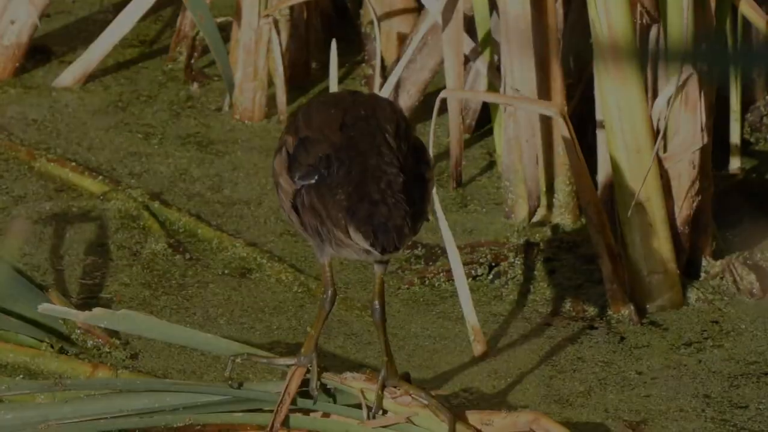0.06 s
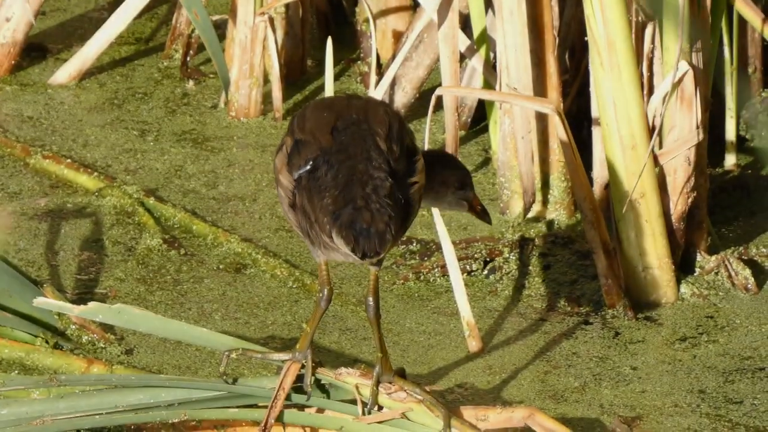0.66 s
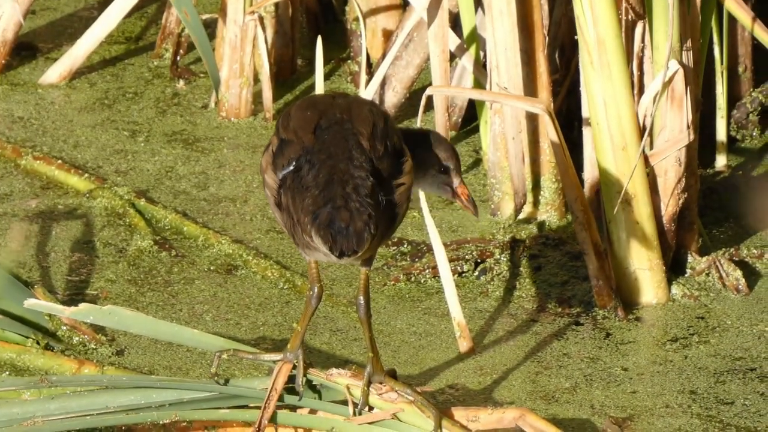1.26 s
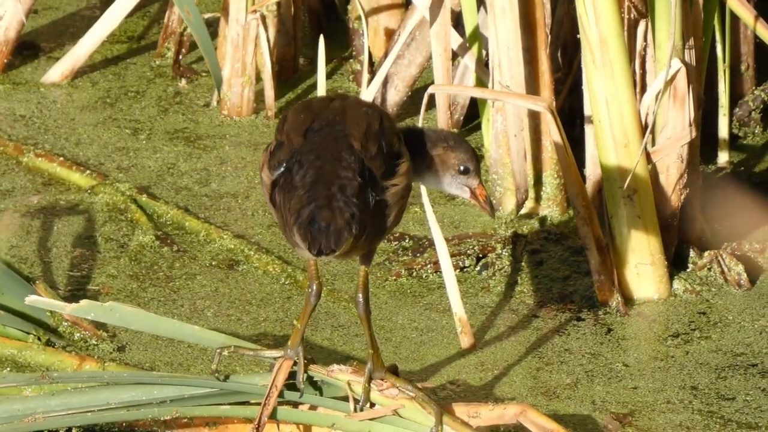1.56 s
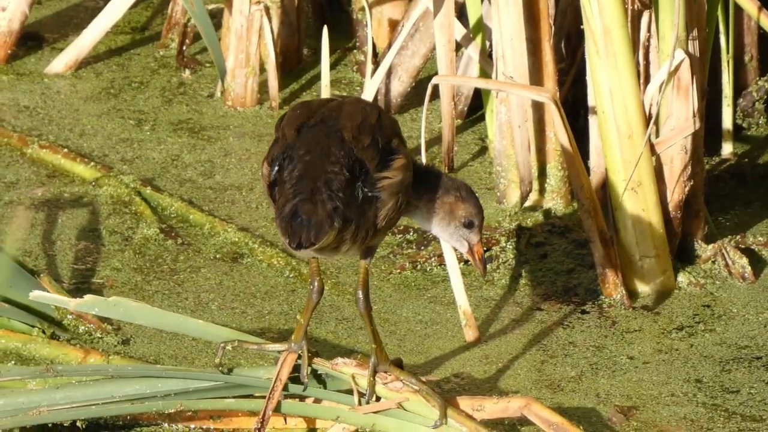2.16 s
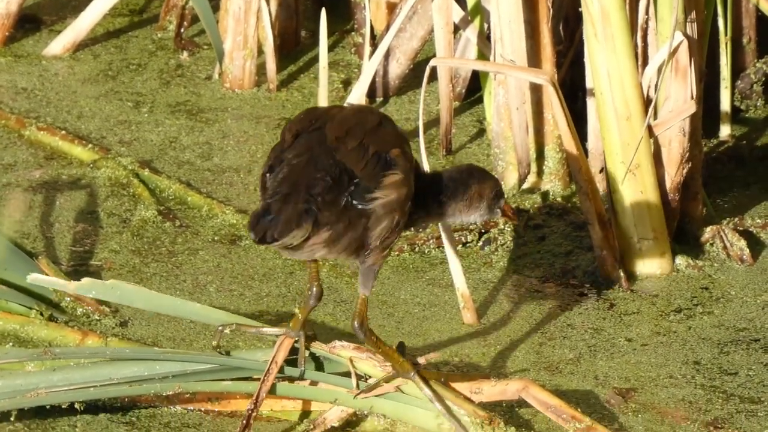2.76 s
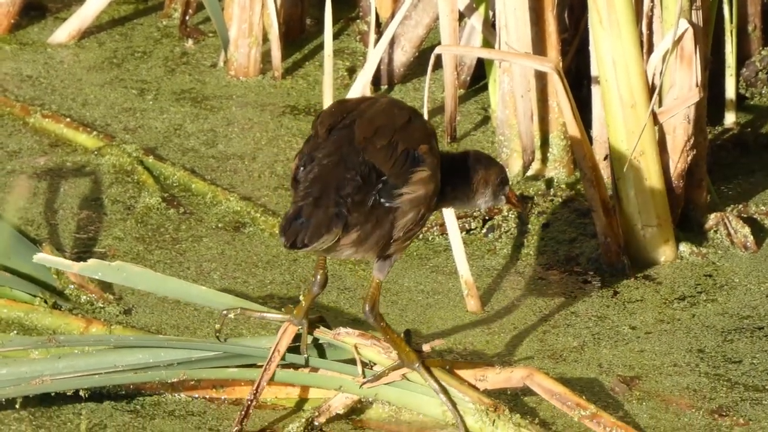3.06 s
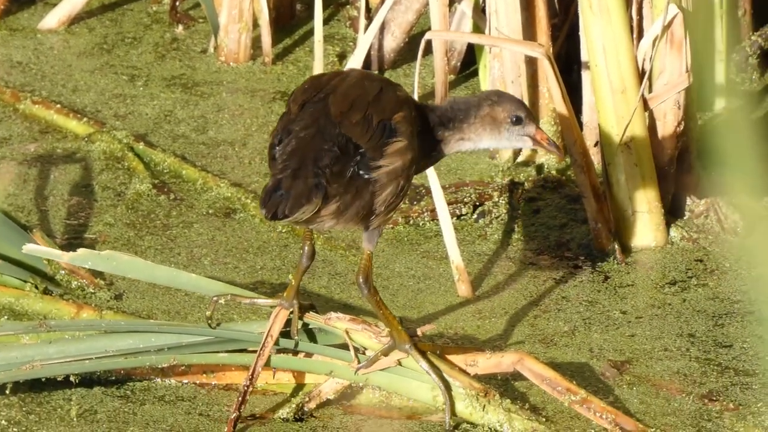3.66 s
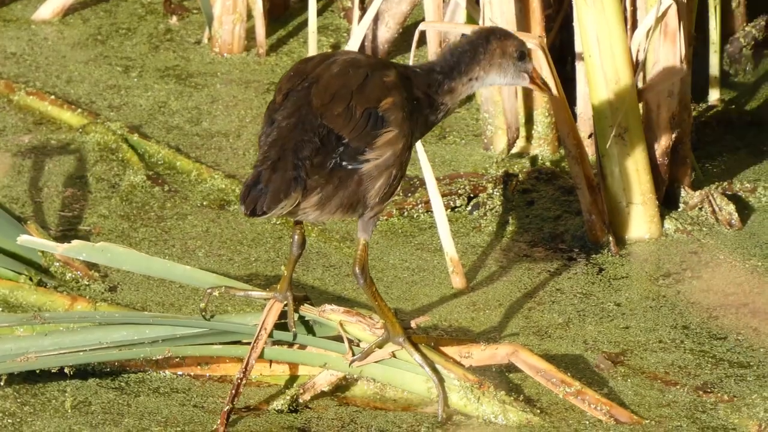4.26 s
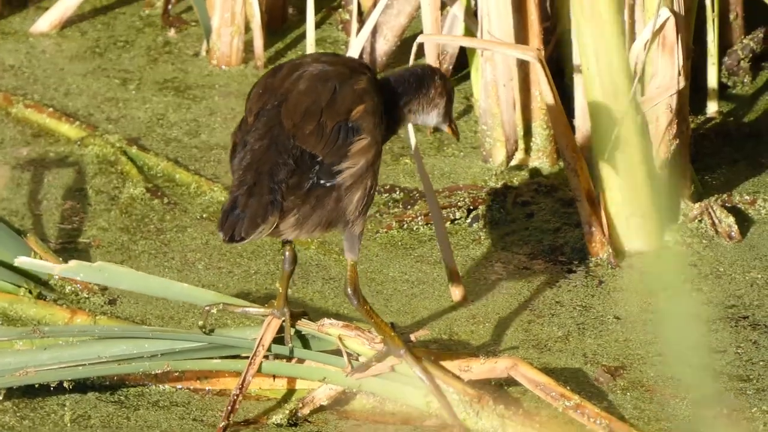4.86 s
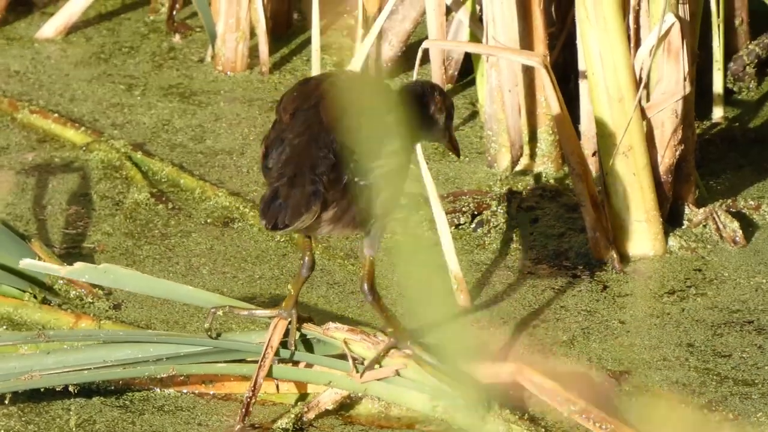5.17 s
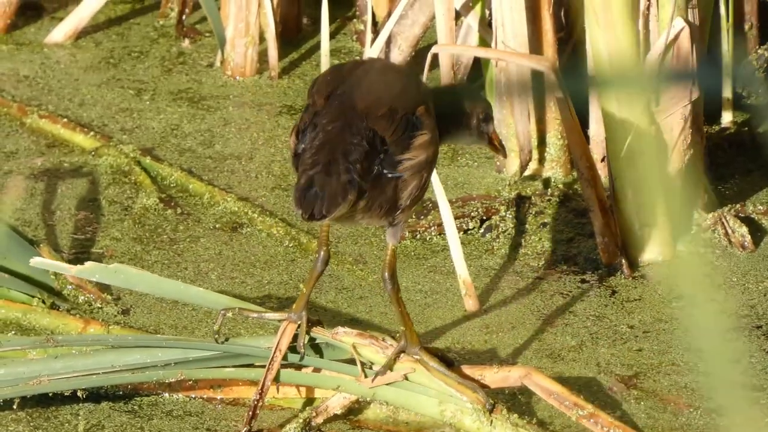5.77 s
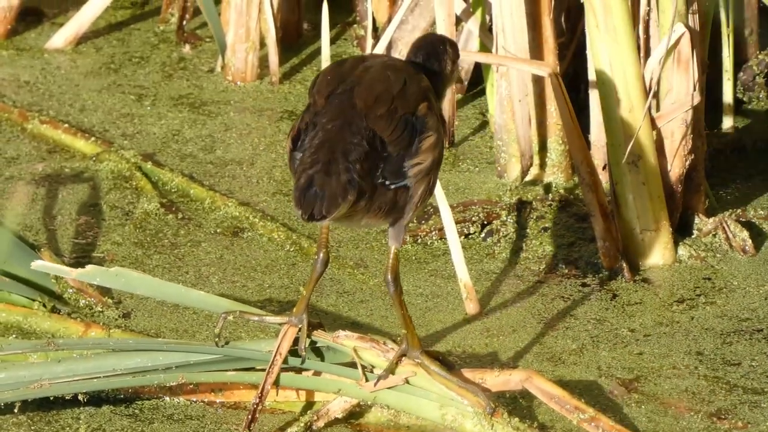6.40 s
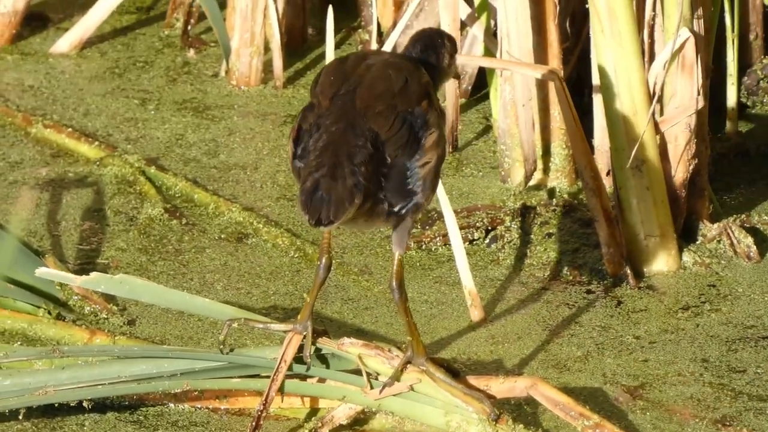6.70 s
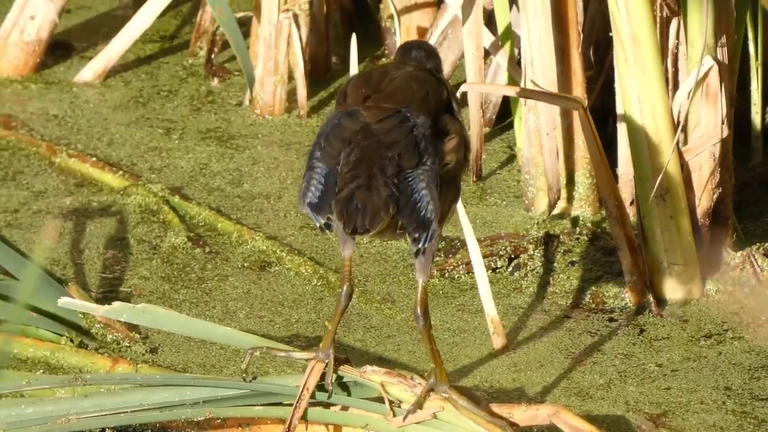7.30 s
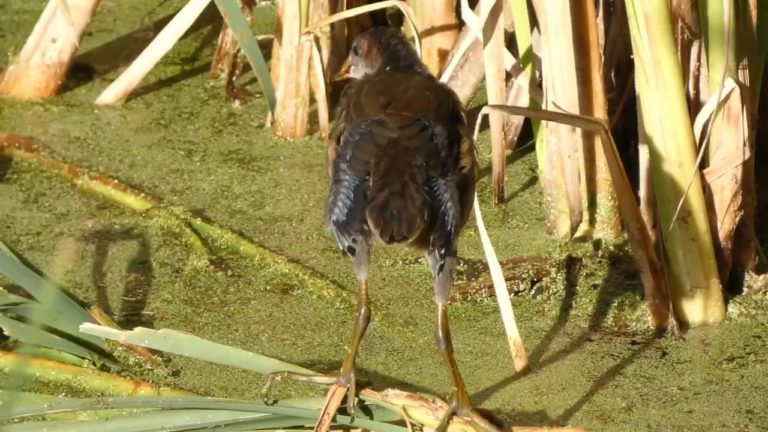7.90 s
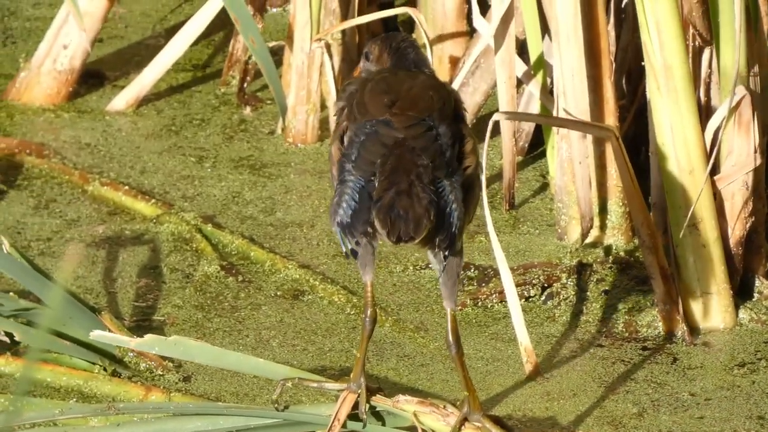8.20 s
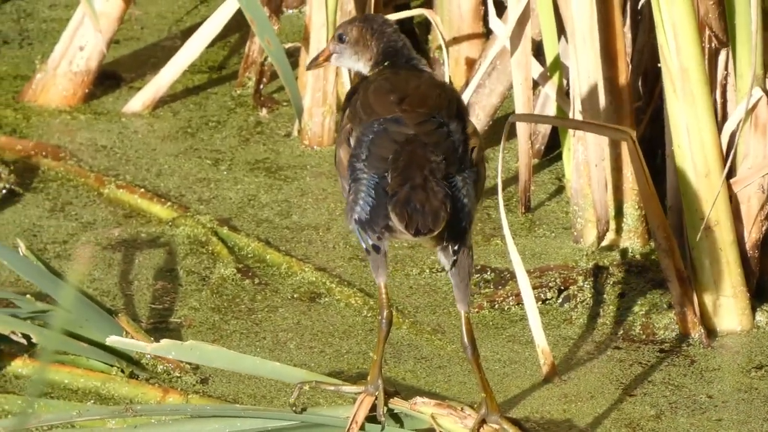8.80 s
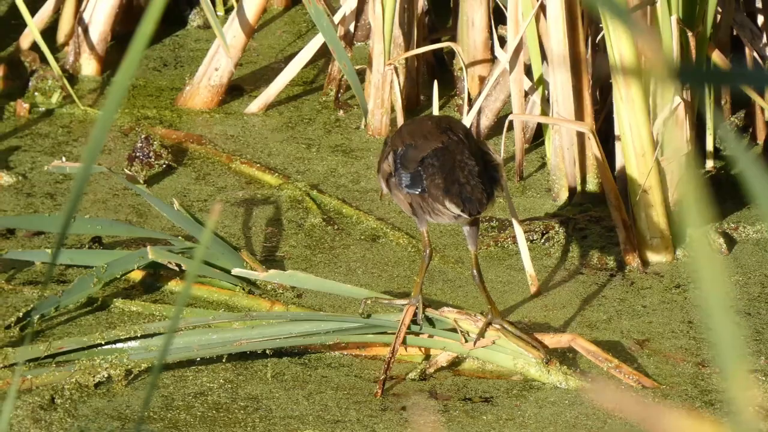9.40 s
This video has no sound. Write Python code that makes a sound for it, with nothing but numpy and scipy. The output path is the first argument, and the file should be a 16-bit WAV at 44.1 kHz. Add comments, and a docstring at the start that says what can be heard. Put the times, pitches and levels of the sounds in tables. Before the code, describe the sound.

Low, uneven wind buffets the microphone in a reed bed by a pond, strongest in the first few seconds. A short, close creak sounds, then the gusts ease, leaving a soft reed hiss, faint bird chirps and a far-off roar leaning to the right. The wind picks up again late on, another little creak follows, and something stiff snaps once.

```python
"""A breezy reed bed by a pond. From the start, reeds hiss over a far-off roar that leans to the right.
Within a second gusts thump on the microphone, and the recorder turns itself down under the strongest.
Leaves rush, dry stems tick and small birds chirp faintly. Just after 3 s something stiff creaks close
by, and then the wind dies down. Near 8 s the gusts pick up again, a second creak follows, and near 9 s
comes one sharp snap."""
import sys
import numpy as np
from scipy import signal
from scipy.io import wavfile
from scipy.ndimage import uniform_filter1d, minimum_filter1d

SR = 44100
rng = np.random.default_rng(int(sys.argv[2]) if len(sys.argv) > 2 else 0)


def transcribe(signal):
    """Save signal, clipped to [-1, 1], as a 16-bit WAV file at the path in sys.argv[1]."""
    frames = np.atleast_2d(signal).T
    limited = np.clip(frames, -1, 1)
    pcm = np.round(limited * 32767).astype(np.int16)
    wavfile.write(sys.argv[1], SR, pcm)


N = 416744

# how alike the background is on the left and right: pitch_hz, likeness (1 = the same)
AIR_LIKENESS = [(60, 0.88), (200, .4), (420, 0.56), (750, .1), (1300, 0.71), (3000, 0.65), (7000, 0.63),
                (14000, .36)]
# which side the roar and hiss lean to: pitch_hz, pan_db (always left minus right)
AIR_BALANCE = [(400, 0), (690, -0.5), (1270, -11.5), (2330, -2), (4300, -0.5), (14000, -2)]
# the tones a dry stem rings with: pitch_hz, level_db, ring_s (time to fade by 60 dB), pan_db
STEM_TONES = [(2780, -18, 0.0061, 0.5), (3400, -4.5, 0.0084, -0.5), (5460, -13, 0.0027, -5),
              (6640, 2.5, 0.0055, -4.5), (9130, -5, 0.0076, -10)]


def gust_strength(attack_s=0.022, fall_db_per_s=265, calm_db=-61.5):
    """The wind's level in dB: each gust comes on quickly, holds, then drops away to calm air."""
    # gusts reaching the microphone: start_s, length_s, level_db
    gusts = [(0.617, 0.18, -34.5), (0.81, 0.1, -34.5), (0.915, 0.057, -30), (1.041, 0.053, -26.5),
             (1.127, 0.19, -26.5), (1.335, 0.17, -32), (1.544, 0.028, -34.5), (1.609, 0.081, -28.5),
             (1.73, 0.14, -24), (1.965, 0.64, -27), (2.145, 0.35, -23), (2.497, 0.29, -23),
             (2.765, 0.15, -22), (2.949, 0.32, -24.5), (3.3, 0.222, -26), (3.523, 0.15, -25),
             (3.67, 0.056, -29), (3.875, 0.096, -38.5), (4.092, 0.07, -38.5), (4.398, 0.062, -46),
             (4.492, 0.12, -34), (4.63, 0.044, -37.5), (4.688, 0.096, -32), (5.011, 0.11, -32.5),
             (5.178, 0.18, -41), (5.438, 0.15, -47), (5.652, 0.038, -41), (5.717, 0.04, -35.5),
             (5.824, 0.063, -36.5), (5.948, 0.055, -42), (6.278, 0.064, -44.5), (7.167, 0.11, -36.5),
             (7.843, 0.12, -31), (8.006, 0.088, -29.5), (8.172, 0.15, -30), (8.62, 0.035, -33.5),
             (8.677, 0.12, -29.5), (8.826, 0.12, -34.5), (9.003, 0.097, -40)]
    age_s = np.arange(SR) / SR
    power = np.full(N, from_db(calm_db) ** 2)
    for start_s, length_s, db in gusts:
        onset = np.minimum(age_s / attack_s, 1)
        lost_db = fall_db_per_s * np.maximum(age_s - length_s, 0)
        add(power, start_s, (onset * from_db(db - lost_db)) ** 2)
    return 10 * np.log10(power)


def wind(gust_db, boost_db=1.0, strong_db=-28.0, brightening=0.12, thinning=0.68):
    """Swirling air beats on the microphone; a stronger gust sheds smaller swirls, which sound higher."""
    # the tone of the rumble: pitch_hz, level_db
    spectrum = [(25, -36), (45, -50.5), (70, -10), (110, 1), (180, 4.5), (320, -5), (490, -29.5),
                (750, -41), (1100, -44.5)]
    # how alike its two sides are: pitch_hz, likeness (noise_bands limits the range)
    likeness = [(60, 0.95), (140, 0.86), (280, 0.49), (550, -1.3), (1100, -0.53)]
    # which side it leans to: pitch_hz, pan_db
    balance = [(100, 4), (200, 1.5), (370, -2.5), (1000, -3)]
    excess_db = np.maximum(gust_db - strong_db, -13)
    tilt_db = thinning * excess_db  # per octave: the weight moves out of the bass
    # small swirls come in quick bursts that lift the upper bands
    reach_db = brightening * excess_db + 2.5 * np.clip(drift(42), -2, 2)
    rumble = 0
    for hz, band in noise_bands(spectrum, likeness, balance):
        octaves_up = np.log2(hz / 180)
        lift_db = reach_db * max(octaves_up, 0) + tilt_db * np.clip(octaves_up, -1.3, 1.5)
        rumble = rumble + band * from_db(lift_db)
    rumble = lowpass(rumble, hz=900, order=3) * flutter(rate=35, depth_db=2.5)
    each_side = np.array([flutter(rate=48, depth_db=3), flutter(rate=25, depth_db=3)])
    rumble = rumble * each_side * panned(-2.45)
    # keep the quick lumps, but let the gust and its puffs set the slow level
    slow_level = np.sqrt(uniform_filter1d(rumble.mean(axis=0) ** 2, size=2400) + 1e-12)
    puffs = flutter(rate=14, depth_db=1.45)
    return rumble / slow_level * from_db(gust_db + boost_db) * puffs


def wind_thumps(rise_share=0.3):
    """A big swirl of air hits the microphone as one thump; smaller, higher ones differ more by side."""
    # single swirls: peak_s, length_s (a third of the whole thump), level_db, pitch_hz, pan_db
    swirls = [(0.626, 0.012, -35.5, 224, -7), (0.66, 0.015, -52, 190, -2), (0.702, 0.018, -33, 162, -9),
              (0.8, 0.013, -26, 189, -4), (0.848, 0.013, -21.5, 178, 2), (0.882, .016, -30, 148, -3),
              (0.908, 0.01, -31.5, 187, -7), (0.963, .011, -23, 199, 7), (1.077, 0.018, -25, 220, 5),
              (1.105, 0.012, -18.5, 298, -13.5), (1.141, 0.018, -28, 310, -4),
              (1.176, 0.011, -21.5, 212, -6), (1.215, .012, -23, 317, -3), (1.251, 0.016, -29, 230, 9),
              (1.307, 0.026, -18, 172, -0.5), (1.491, 0.015, -24.5, 141, 2.5), (1.559, 0.011, -22, 190, 3),
              (1.766, 0.012, -25, 252, -2), (1.801, 0.022, -20, 159, -7), (1.85, 0.015, -20.5, 250, -3),
              (1.948, 0.017, -23.5, 165, -9), (2.029, 0.016, -23, 202, 11), (2.08, 0.021, -18, 250, -4),
              (2.128, .012, -19.5, 201, -7), (2.169, 0.0076, -20, 323, -14), (2.198, 0.02, -19, 336, 3),
              (2.229, 0.0097, -10, 262, -3), (2.24, 0.0075, -18, 427, -12), (2.294, 0.013, -19, 209, 5),
              (2.312, 0.0087, -20.5, 337, 2), (2.338, .018, -13.5, 269, -3), (2.365, 0.012, -21, 334, -2),
              (2.415, .007, -20.5, 392, -12), (2.451, 0.0097, -16.5, 243, 4), (2.469, .012, -18.5, 367, -7),
              (2.532, 0.016, -24, 216, -18), (2.649, 0.021, -22.5, 267, -16), (2.69, 0.024, -19.5, 279, -3),
              (2.717, 0.0075, -29, 420, -1), (2.809, 0.008, -13, 223, -4.5), (2.836, 0.013, -19, 370, -7),
              (2.904, 0.022, -15.5, 222, 0), (3.003, 0.022, -22, 155, 0), (3.032, 0.011, -22, 322, -3),
              (3.063, 0.018, -21.5, 300, -18), (3.113, .008, -29, 345, -10),
              (3.166, 0.0086, -21.5, 363, -3), (3.22, 0.0087, -29, 360, -8), (3.246, 0.013, -12.5, 182, -1),
              (3.316, 0.0057, -24, 330, -9), (3.335, 0.027, -21.5, 248, -6), (3.418, 0.024, -25, 218, -7),
              (3.594, 0.03, -19.5, 197, 5), (3.654, 0.013, -23.5, 325, 13), (3.957, .012, -34, 159, 0),
              (4.153, .014, -39, 162, 0), (4.576, 0.016, -28, 187, -4), (4.653, 0.01, -21.5, 194, -8),
              (4.714, 0.012, -34, 157, -8), (4.822, 0.01, -32.5, 164, -3), (5.037, .01, -24, 185, -11),
              (5.078, 0.011, -26.5, 171, -2), (5.4, 0.011, -35, 148, -5), (5.761, 0.021, -32, 146, 4),
              (7.212, 0.021, -30.5, 171, 7), (7.262, 0.018, -33, 163, 3), (7.9, 0.009, -31, 370, 5),
              (7.921, .012, -20, 193, 6), (7.943, .014, -24, 204, 6), (8.078, .014, -29, 209, 2),
              (8.102, 0.0088, -35.5, 175, -7), (8.217, 0.012, -29, 185, -6), (8.223, .012, -29.5, 340, 3),
              (8.251, .009, -23, 216, -3), (8.267, 0.013, -33, 390, 0), (8.271, 0.012, -25.5, 216, 2),
              (8.302, 0.01, -26.5, 173, -6), (8.726, .012, -24, 172, 6), (8.767, 0.017, -32, 210, 2.5),
              (8.881, .013, -30, 150, -2)]
    out = np.zeros((2, N))
    for peak_s, length_s, db, hz, pan_db in swirls:
        progress = np.linspace(0, 1, round(3 * length_s * SR))
        swell = np.sin(np.pi / 2 * np.interp(progress, [0, rise_share, 1], [0, 1, 0])) ** 2
        noise = highpass(rng.standard_normal((2, SR // 4)), 0.76 * hz, order=3)
        noise = lowpass(noise, 1.071 * hz, order=4)[:, -len(swell):]
        middle, side = (rms_one(part * swell) * swell.std() * np.sqrt(3) for part in noise)
        side = side * from_db(-10 + 8 * np.log2(hz / 180))
        thump = from_db(db) * (middle + side * [[1], [-1]]) * panned(pan_db)
        add(out, peak_s - rise_share * len(swell) / SR, thump)
    return out


def creaks(unevenness=0.072, scrape_db=-37, scrape_s=0.18, grains_per_s=6000):
    """A stiff joint sticks and slips about a thousand times a second, then scrapes on briefly."""
    # runs of slips, two to a creak:
    # start_s, length_s, first_slips_per_s, last_slips_per_s, level_db, pan_db, top_hz
    runs = [(3.2696, 0.01, 800, 1220, -28, 3, 11000), (3.303, 0.0038, 1140, 830, -33, 0, 5470),
            (8.4106, 0.009, 780, 1200, -25, 3, 9300), (8.4465, 0.0042, 1020, 800, -29, 3.5, 5600)]
    # the tones the creaking part rings with: pitch_hz, level_db, ring_s
    tones = [(990, -1, 0.0086), (1910, -3.5, 0.0059), (3610, -7, 0.0074), (4300, -5, 0.0056),
             (5160, -7.5, 0.005), (6600, -12.5, 0.0034), (7400, -27, 0.0026), (9100, -14, 0.002)]
    slips, wobble = np.zeros((2, N)), drift(440)
    for start_s, length_s, first, last, db, pan_db, top_hz in runs:
        rate = np.linspace(first, last, round(length_s * SR))
        rate = rate * (1 + unevenness * np.roll(wobble, -round(start_s * SR))[:len(rate)])
        clicks = np.diff(np.floor(np.cumsum(rate) / SR), prepend=-1)
        force = np.linspace(0.3, 1, len(rate))  # harder as the joint gives way
        add(slips, start_s, from_db(db) * lowpass(clicks * force, top_hz) * panned(pan_db))
    # rubbing noise dies away after the slips
    sliding = signal.lfilter([1], [1, -from_db(-60 / (scrape_s * SR))], slips + 1e-18)
    scrape = from_db(scrape_db) * sliding * rng.standard_normal(N) * (rng.random(N) < grains_per_s / SR)
    body = sum(ring(slips + scrape, *tone) for tone in tones)
    body = smear(body, bending=0.51, stages=8)
    body = highpass(body, hz=650)  # a small part gives off little bass
    return scatter(body, level_db=-7.5, fade_s=0.12)


def snap():
    """Something stiff snaps: three hits, so close that they sound as one, set it ringing."""
    # the hits: start_s, level_db
    hits = [(8.8938, -31), (8.8946, -16), (8.8953, -37)]
    # the tones the snapping part rings with: pitch_hz, level_db, ring_s, pan_db
    tones = [(1464, -21, 0.079, -16.5), (1635, -13.5, 0.047, -13.5), (2050, -11, 0.019, -5),
             (2390, -14, 0.027, 5), (2990, -2.5, 0.016, 3), (4420, -12, 0.011, -4), (6000, -18, 0.0053, 8),
             (7730, -19, 0.014, 4), (9900, -21, 0.0063, -12)]
    crack = smear(knocks(hits, tones), bending=0.57, stages=20)
    return scatter(crack, level_db=-16, fade_s=0.079)


def stem_ticks():
    """Dry stems knock together; a thinner stem rings higher."""
    # the knocks: start_s, level_db, pitch_ratio (1 = the usual stem)
    hits = [(1.049, -54, .6), (1.998, -57, 1), (2.068, -49, 1), (3.555, -51, 1.3), (4.602, -51, 1)]
    ticks = 0
    for start_s, db, pitch_ratio in hits:
        tones = [(hz * pitch_ratio, *rest) for hz, *rest in STEM_TONES]
        ticks = ticks + knocks([(start_s, db)], tones)
    return scatter(ticks, level_db=-1, fade_s=0.08)


def birds(opening_ratio=0.71, fall_curve=0.96, waver=0.012, overtone_db=-17):
    """Birds whistle notes that rise and fall, some raspy, blurred by echoes across the pond."""
    # the notes: start_s, length_s, top_hz, last_hz, rise_share (0-1), level_db, pan_db, rasp (0-1)
    notes = [(1.328, 0.036, 4750, 4600, 0.26, -61, -6, .2), (1.33, .085, 4200, 3580, 0.42, -58, -6, 0.6),
             (1.568, .032, 5000, 3900, 0.11, -55, -8, .1), (1.587, .085, 2795, 2390, .25, -49, 9, 0),
             (1.644, .034, 3620, 3550, 0.37, -56, -2, 0.3), (2.951, .012, 3330, 2600, .15, -57, 5, 0.3),
             (3.01, 0.045, 3580, 3200, 0.18, -67, 0, .6), (3.136, .022, 3950, 3850, .85, -62, 0, .2),
             (3.658, 0.078, 4460, 3430, 0.29, -63, 8, 1), (4.449, 0.076, 4500, 3170, .27, -61.5, -12, .55),
             (5.194, 0.022, 3200, 3080, 0.66, -60, 4, .3), (5.231, .036, 3020, 2550, 0.42, -53, -5, .35),
             (5.232, 0.022, 2095, 1600, 0.28, -52, 9, 0.8), (5.836, .084, 2790, 2240, 0.27, -53.5, 7, 0.25),
             (7.005, .04, 4900, 4520, .4, -60, -8, 0.1), (6.995, 0.12, 4300, 3520, .4, -63, -6, 0.7),
             (7.61, .038, 5930, 4790, .15, -60, -1, .1), (7.607, .034, 5370, 4800, 0.28, -64, -6, .3),
             (7.697, .04, 5550, 3300, .1, -63, -2, .3), (9.2, .105, 2790, 2220, .2, -52, 5, 0.2)]
    # echoes off the far banks and the wall of reeds: delay_s, level_db
    echoes = [(0.018, -14), (0.035, -23), (.064, -34), (0.106, -23)]
    out, roughness = np.zeros((2, N)), drift(380)
    for start_s, length_s, top_hz, last_hz, rise_share, db, pan_db, rasp in notes:
        progress = np.linspace(0, 1, round(length_s * SR))
        rising = np.interp(progress, [0, rise_share], [1, 0])
        falling = np.interp(progress, [rise_share, 1], [0, 1])
        hz = top_hz * (1 - (1 - opening_ratio) * rising ** 2) - (top_hz - last_hz) * falling ** fall_curve
        wobble = np.interp(progress, np.linspace(0, 1, 20), rng.standard_normal(20))
        phase = 2 * np.pi * np.cumsum(hz * (1 + waver * wobble)) / SR
        whistle = np.sin(phase) + from_db(overtone_db) * np.sin(2 * phase)
        # an uneven voice makes the pure tone raspy
        voice = rms_one(1 - rasp + rasp * np.roll(roughness, -round(start_s * SR))[:len(progress)])
        swell = np.sqrt(np.abs(np.sin(np.pi * progress)))
        add(out, start_s, from_db(db) * whistle * voice * swell * panned(pan_db))
    direct = out.copy()
    for delay_s, db in echoes:
        add(out, delay_s, from_db(db) * direct)
    return scatter(out, level_db=-4.5, fade_s=0.12)


def leaf_rush(pan_db=-7.5):
    """A breeze sweeps through the leaves: an airy rush that swells and fades."""
    # the sweeps: peak_s, length_s, level_db
    sweeps = [(0.782, 0.6, -49.5), (1.687, 0.32, -50.5), (1.994, 0.19, -50.5), (2.95, 0.49, -51.5),
              (9.283, 0.55, -51)]
    # the tone of the leaves: pitch_hz, level_db
    spectrum = [(500, -5), (700, 2.5), (1100, 4.5), (1600, 1), (2100, -11.5), (3000, -16.5)]
    t = np.arange(N) / SR
    swell = sum(from_db(db) * np.exp(-2 * ((t - peak_s) / length_s) ** 2)
                for peak_s, length_s, db in sweeps)
    return swell * sum(band for _, band in noise_bands(spectrum, AIR_LIKENESS, [(1000, pan_db)]))


def reeds(hiss_db, boost_db=4.0, touches_per_s=150, touch_spread_db=4, touch_db=-9):
    """Far leaves blend into a hiss that sways a little; nearer ones touch with tiny dry clicks."""
    # the tone of the hiss: pitch_hz, level_db
    spectrum = [(1530, -24.5), (2600, 7.5), (3190, -5.5), (4340, -1.5), (5330, -2.5), (6590, -6.5),
                (8030, -10), (10000, -11), (11500, -20.5), (13300, -24.5), (14300, -32), (15000, -36)]
    hiss = sum(band for _, band in noise_bands(spectrum, AIR_LIKENESS, AIR_BALANCE))
    hiss = hiss * flutter(rate=11, depth_db=1.3)
    hiss = 0.5 * (hiss + signal.lfilter(*signal.iirnotch(4680, 10, fs=SR), hiss))  # a shallow treble dip
    touches = 0
    for *tone, pan_db in STEM_TONES:
        sizes = from_db(-touch_spread_db * np.minimum(rng.exponential(1, N), 4))
        clicks = sizes * rng.choice([-1, 1], N) * (rng.random(N) < touches_per_s / SR)
        touches = touches + ring(clicks, *tone) * panned(pan_db)
    return from_db(hiss_db) * (from_db(boost_db) * hiss + from_db(touch_db) * rms_one(touches))


def far_roar(roar_db, boost_db=3.5):
    """A smooth distant roar, like that of a road, with a drone on one pitch inside it."""
    # the tone of the roar: pitch_hz, level_db
    spectrum = [(35, -6.5), (75, 7), (160, 0), (250, -1.5), (350, -1.5), (600, -0.5), (900, -1),
                (1250, 1.5), (1600, -5), (2100, -9), (2600, -18), (3200, -24.5)]
    # how the drone swells and fades: time_s, level_db
    drone_levels = [(0.0, -58.5), (1.0, -55.5), (3.8, -59.5), (5.3, -58.5), (6.0, -64.5), (6.8, -58),
                    (7.6, -56.5), (8.8, -59.5), (9.2, -61)]
    bands = noise_bands(spectrum, AIR_LIKENESS, AIR_BALANCE)
    roar = lowpass(sum(band * flutter(rate=5.9, depth_db=1.67) for _, band in bands), hz=3640)
    drone = rms_one(ring(rng.standard_normal(N), hz=435, db=0, ring_s=0.15))
    drone = drone * flutter(rate=5.1, depth_db=2.3) * panned(0.84)
    drone_db, = in_time(drone_levels)
    return from_db(roar_db + boost_db) * roar + from_db(drone_db) * drone


def noise_bands(spectrum, likeness, balance):
    """Stereo noise in slices 0.4 octave wide, each given as (pitch_hz, sound)."""
    edges = 2 ** np.arange(np.log2(spectrum[0][0]), np.log2(spectrum[-1][0]) + 0.4, 0.4)
    centres = np.sqrt(edges[1:] * edges[:-1])
    gains = from_db(at_hz(spectrum, centres)) * np.sqrt(centres)  # wider slices hold more power
    white = rng.standard_normal((2, 2, N))
    for k, (hz, gain) in enumerate(zip(centres, gains / np.linalg.norm(gains))):
        bandpass = signal.butter(2, edges[k:k + 2], "band", fs=SR, output="sos")
        middle, side = rms_one(signal.sosfilt(bandpass, white[k % 2]))
        alike = np.clip(at_hz(likeness, hz), -0.6, 0.95)
        pair = middle + np.sqrt((1 - alike) / (1 + alike)) * side * [[1], [-1]]
        yield hz, gain * pair * panned(at_hz(balance, hz))


def knocks(hits, tones):
    """Each hit is a click that sets a part ringing; each tone leans to its own side."""
    clicks = np.zeros(N)
    for start_s, db in hits:
        add(clicks, start_s, from_db([db]))
    return sum(ring(clicks, *tone) * panned(pan_db) for *tone, pan_db in tones)


def ring(x, hz, db, ring_s):
    """Every push in x starts a tone that fades by 60 dB in ring_s."""
    decay, step = from_db(-60 / (ring_s * SR)), 2 * np.pi * hz / SR
    feedback = [1, -2 * decay * np.cos(step), decay * decay]
    return from_db(db) * signal.lfilter([0, np.sin(step)], feedback, x + 1e-18)


def smear(x, bending, stages):
    """A bending part carries treble faster than bass, so a click spreads out a little in time."""
    return signal.sosfilt([[-bending, 1, 0, 1, -bending, 0]] * stages, x + 1e-18)


def scatter(x, level_db, fade_s):
    """Countless stems throw a sound back as a short, soft tail."""
    t = np.arange(SR // 2) / SR
    tail = rng.standard_normal((2, len(t))) * from_db(-60 * t / fade_s)
    tail /= np.linalg.norm(tail, axis=1, keepdims=True)
    return x + from_db(level_db) * signal.fftconvolve(x, tail, axes=1)[:, :N]


def drift(rate):
    """A smooth random curve of typical size 1, changing about `rate` times a second."""
    decay = np.exp(-40 * np.pi * rate / SR)
    noise = rng.standard_normal(N // 20 + 4002)  # one value for every 20 samples
    slow = signal.lfilter([1], [1, -2 * decay, decay * decay], noise)[4000:]
    return np.interp(np.arange(N) / 20, np.arange(len(slow)), rms_one(slow))


def flutter(rate, depth_db):
    """A wavering volume with an average power of 1."""
    return rms_one(from_db(depth_db * np.clip(drift(rate), -2, 2)))


def from_db(db):
    """Turn decibels into a number to multiply by."""
    return 10 ** (np.asarray(db) / 20)


def rms_one(x):
    """Scale a sound to an average power of 1."""
    return x / np.sqrt(np.mean(x ** 2) + 1e-20)


def in_time(rows):
    """Join timed points with straight lines, giving one curve for each value column."""
    times_s, *columns = np.transpose(rows)
    return [np.interp(np.arange(N) / SR, times_s, column) for column in columns]


def at_hz(points, hz):
    """Read a table at any pitch, with the octaves evenly spaced."""
    pitches_hz, values = np.transpose(points)
    return np.interp(np.log(hz), np.log(pitches_hz), values)


def panned(pan_db):
    """Left and right volumes that average 1; a positive pan_db leans left."""
    gains = from_db(np.array([[0.5], [-0.5]]) * pan_db)
    return gains / gains.mean()


def add(track, start_s, sound):
    """Mix a sound into a track at start_s."""
    i = round(start_s * SR)
    track[..., i:i + sound.shape[-1]] += sound[..., :N - i]


def lowpass(x, hz, order=2):
    """Turn down everything above hz."""
    return signal.sosfilt(signal.butter(order, hz, fs=SR, output="sos"), x)


def highpass(x, hz, order=2):
    """Turn down everything below hz."""
    return signal.sosfilt(signal.butter(order, hz, "high", fs=SR, output="sos"), x)


def auto_volume(x, threshold_db=-28.5, squeeze=0.69, hold_s=0.31, recovery_db_per_s=15):
    """The recorder turns down at once when the sound gets loud, waits, then creeps back up."""
    level_db = 10 * np.log10(uniform_filter1d(x.mean(axis=0) ** 2, size=3500) + 1e-12)
    wanted_db = squeeze * np.minimum(threshold_db - level_db, 0)
    half_hold = round(hold_s * SR / 2)
    held_db = minimum_filter1d(wanted_db, size=2 * half_hold + 1, origin=half_hold)
    recovered_db = recovery_db_per_s * np.arange(N) / SR
    gain_db = np.minimum.accumulate(held_db - recovered_db) + recovered_db
    return x * from_db(uniform_filter1d(gain_db, size=1300))


def scene():
    """Mix the small close sounds, the wind on the microphone and the pond's surroundings."""
    # how the background swells and fades, before each layer's boost: time_s, roar_db, hiss_db
    background_levels = [(0.0, -54, -66), (0.5, -53.5, -65), (0.8, -53, -65.5), (1.38, -49, -62.5),
                         (1.7, -44.5, -60.5), (1.87, -48.5, -64.5), (2.0, -48.5, -61), (2.15, -49, -63.5),
                         (2.45, -50.5, -64.5), (3.1, -54, -67.5), (3.4, -50.5, -66), (4.0, -51, -66.5),
                         (4.3, -53.5, -68.5), (4.55, -52, -66), (5.3, -52, -67), (6.0, -51.5, -67.5),
                         (6.7, -52.5, -68), (7.45, -54, -66.5), (7.95, -52.5, -65), (8.4, -48.5, -62.5),
                         (8.8, -52, -64.5), (9.45, -53, -65.5)]
    roar_db, hiss_db = in_time(background_levels)
    close = lowpass(snap(), hz=11500, order=4) + lowpass(creaks() + stem_ticks(), hz=11200, order=5)
    gusts = wind(gust_strength()) + wind_thumps()
    return close + gusts + far_roar(roar_db) + leaf_rush() + reeds(hiss_db) + birds()


def record(dry):
    """The recorder cuts the deepest rumble, turns down under gusts and cuts the highest treble."""
    levelled = auto_volume(highpass(dry, hz=46, order=3))
    treble_cut = signal.ellip(10, 0.1, 80, 14500, fs=SR, output="sos")
    return signal.sosfilt(treble_cut, levelled)


dry = scene()
out = record(dry)
transcribe(out)
```